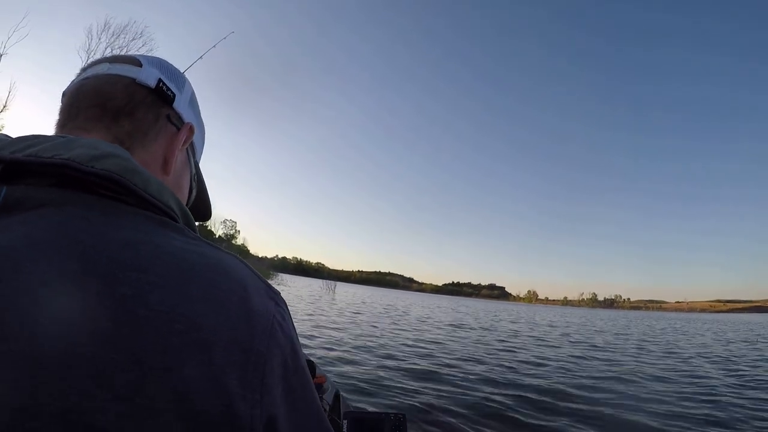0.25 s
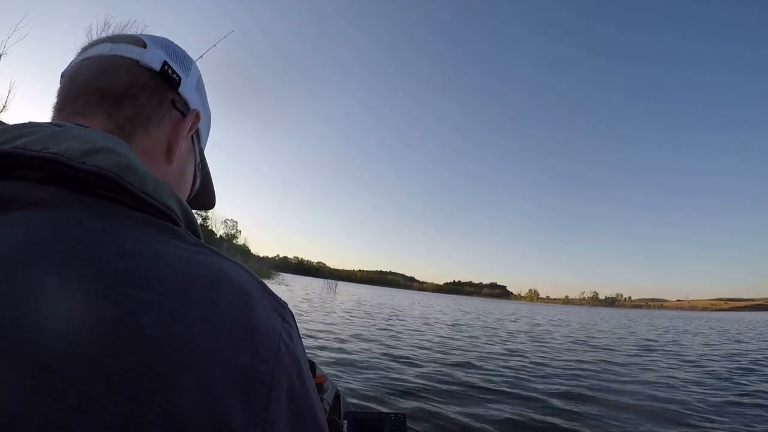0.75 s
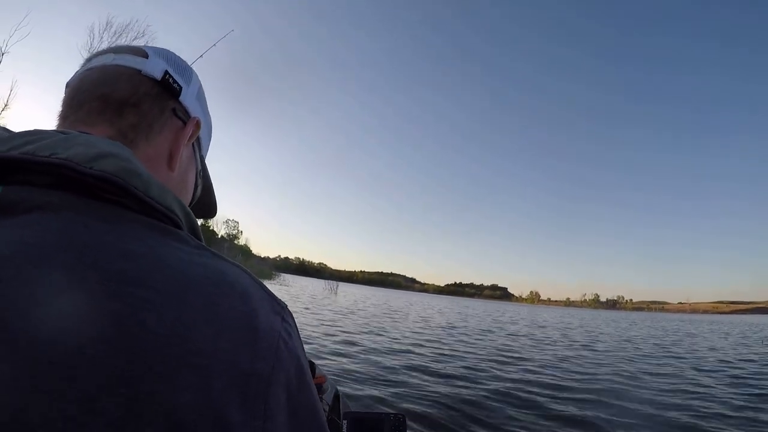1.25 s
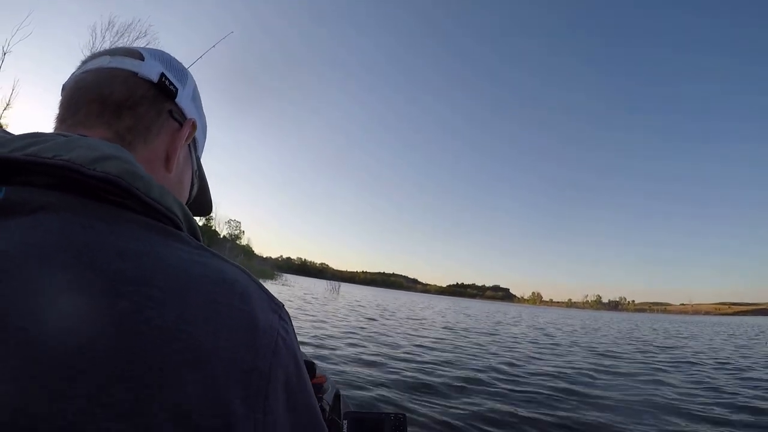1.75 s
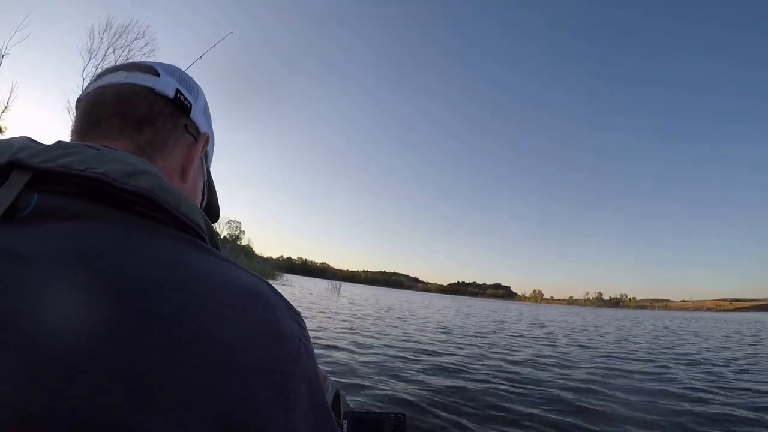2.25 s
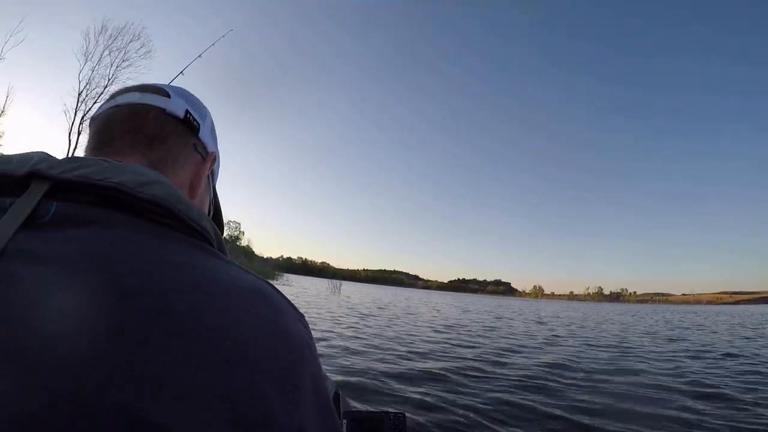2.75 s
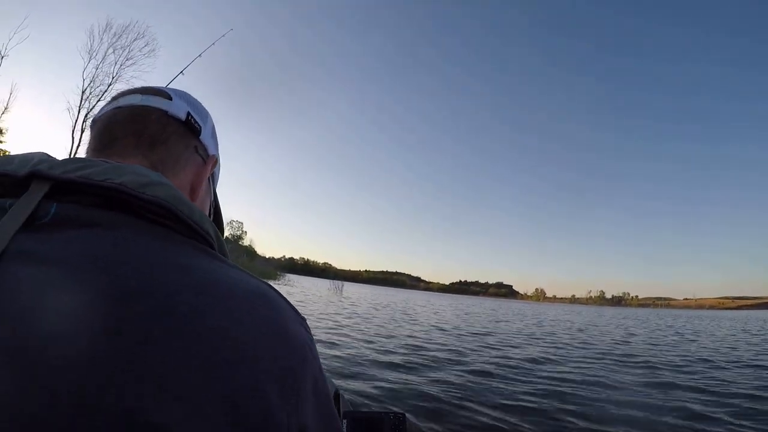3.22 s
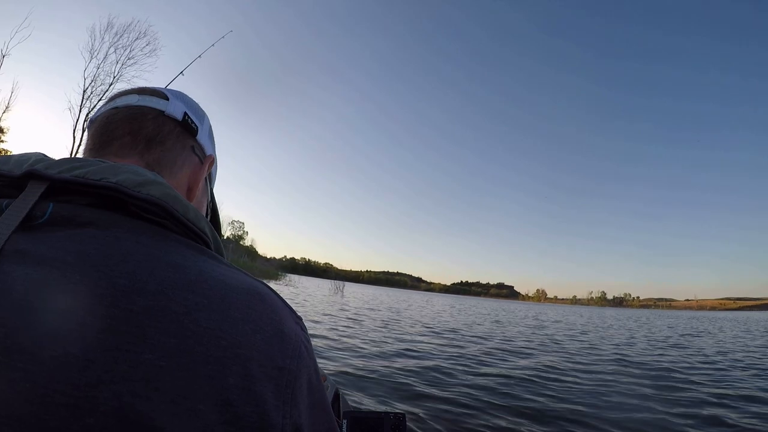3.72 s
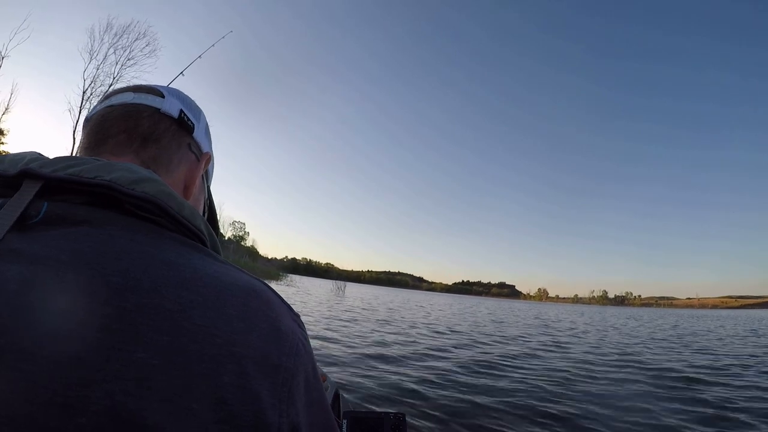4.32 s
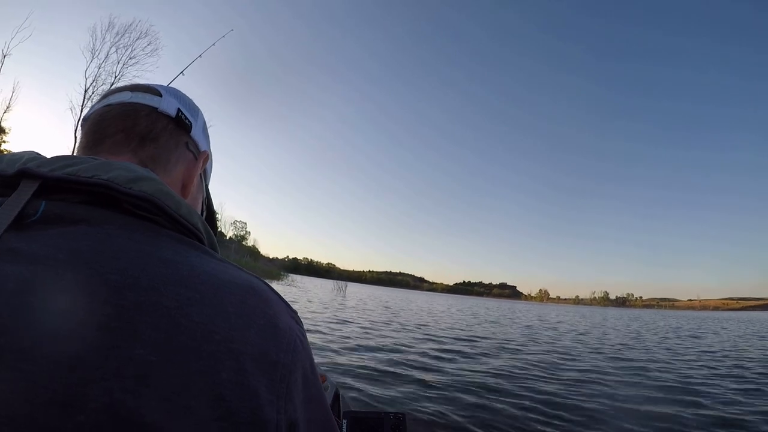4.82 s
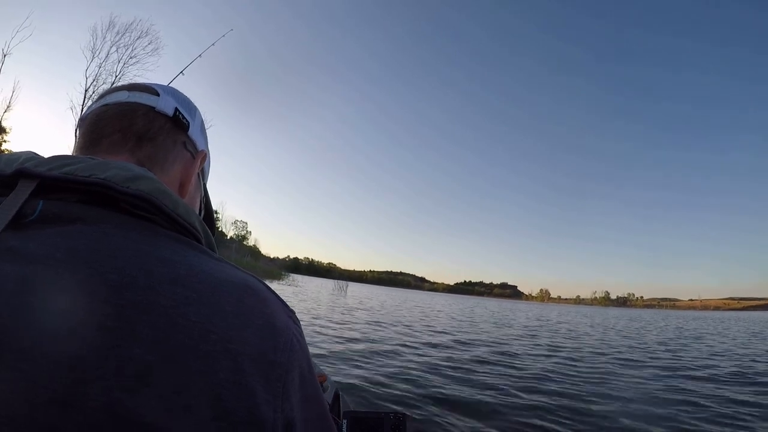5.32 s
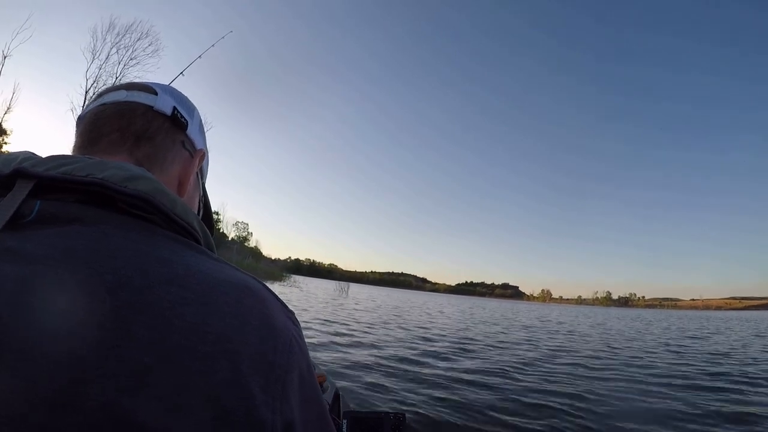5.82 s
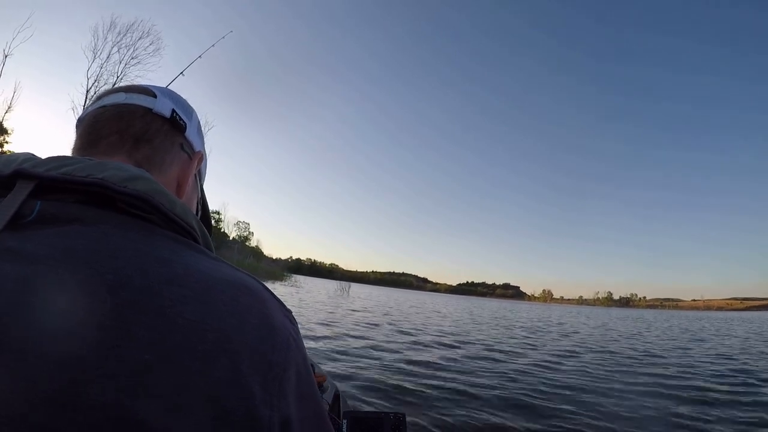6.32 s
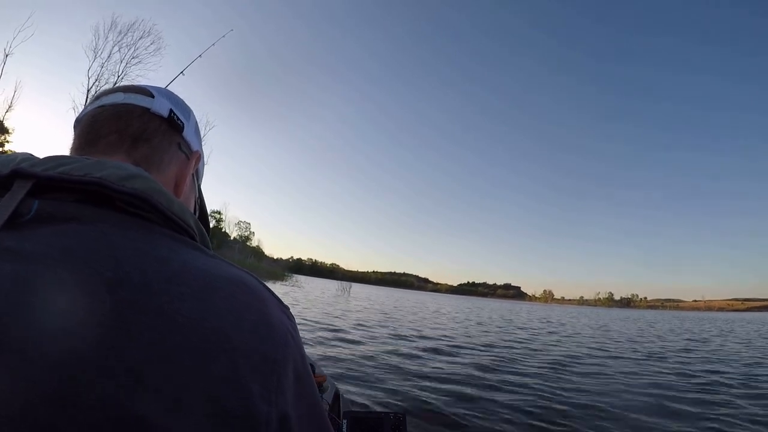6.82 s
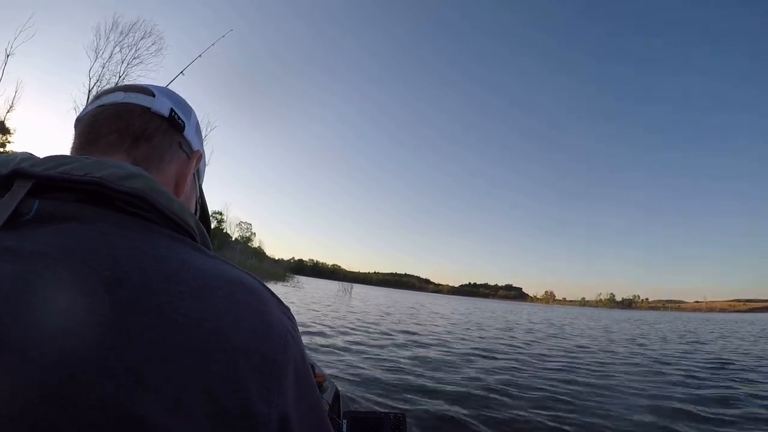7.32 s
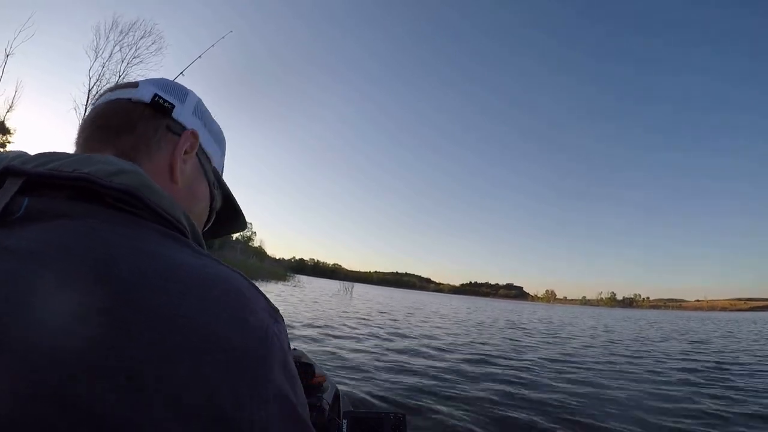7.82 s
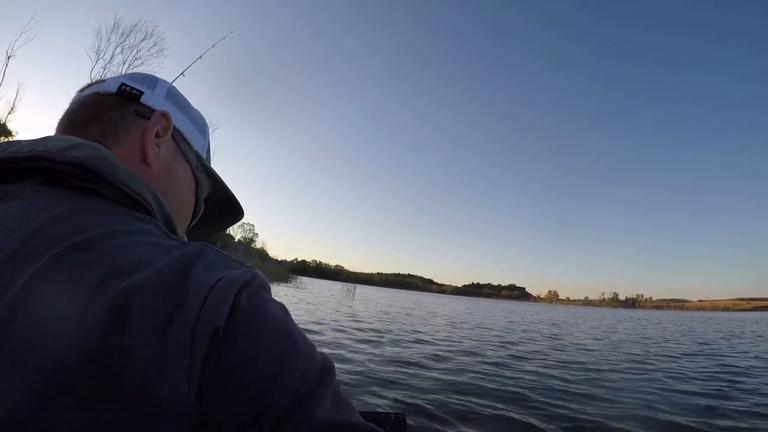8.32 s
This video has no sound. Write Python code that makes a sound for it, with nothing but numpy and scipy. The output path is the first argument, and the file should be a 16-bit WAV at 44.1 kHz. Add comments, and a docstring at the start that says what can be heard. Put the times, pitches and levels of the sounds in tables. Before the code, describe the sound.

Hollow, irregular water slaps on a kayak, with a gust buffeting the microphone and gear knocking before faint birds chirp far away.

```python
"""Small waves slap a plastic kayak on a lake, ringing its hull at two hull-mounted microphone ports.
From the start, water and microphones hiss and electronics whine faintly; the hardest slap is at 0.5 s.
Over the first 3 s a gust shakes the mount, jolts thump, and gear knocks and ticks.
From 2.9 s, as the wind dies, birds whistle and chirp on the far shore above their faint chatter.
Near 8.2 s the gear knocks again; the waves go on to the end."""
import sys
import numpy as np
from scipy import signal
from scipy.io import wavfile
from scipy.ndimage import uniform_filter1d

SR = 44100
rng = np.random.default_rng(int(sys.argv[2]) if len(sys.argv) > 2 else 0)


def transcribe(u):
    """Save the signal u as a 16-bit wav file named by the first command-line argument.

    u: samples, shape (n,) or (channels, n), limited to [-1, 1]; the rate is SR.
    q: integer samples, one column per channel.
    """
    v = np.clip(np.atleast_2d(u).T, -1, 1)
    q = np.round(v * 32767).astype(np.int16)
    wavfile.write(sys.argv[1], SR, q)


N = 377496

# t/s, peak level/dB
WAVE_SLAPS = [(0.022, -28.5), (0.496, -8.5), (0.592, -21.5), (0.762, -20), (0.852, -21), (1.026, -23),
              (1.23, -19), (1.807, -40), (2.604, -15.5), (2.665, -23.5), (2.846, -23.5), (3.353, -20),
              (3.508, -30.5), (3.918, -17), (4.245, -31.5), (4.488, -38), (4.583, -23), (4.821, -30),
              (5.097, -15), (5.342, -26), (5.441, -31.5), (5.7, -36), (5.794, -22), (6.359, -19),
              (6.906, -15.5), (7.076, -29), (7.18, -30), (7.467, -16), (7.69, -28.5), (8.205, -29.5),
              (8.432, -15)]
def slaps():
    """Waves ring the hull. Bigger ones trap deeper-pitched air pockets; weaker ones gurgle longer."""
    out, body = np.zeros((2, N)), panels()
    for (s, db), noise in zip(WAVE_SLAPS, rng.standard_normal((len(WAVE_SLAPS), SR // 5))):
        force = wave_force(noise, life_s=0.02 - 0.0014 * db, start_hz=157 - 0.76 * (db + 25.5))
        add(out, s - 0.018, struck(force, body, db))
    return out


def lapping(rate_per_s=16, rms_db=-40):
    """Wavelets of four shapes patter on the hull at random."""
    sizes = amp(4.4 * np.minimum(rng.exponential(1, N), 2))
    hits = sizes * (rng.random(N) < rate_per_s / SR)
    kind = rng.integers(0, 4, N)
    force = np.zeros(N)
    for k, noise in enumerate(rng.standard_normal((4, SR // 5))):
        shape = wave_force(noise, life_s=0.018 + 0.0071 * k, start_hz=150 + 9 * k, smack=0.51, splash=1)
        force += signal.oaconvolve(hits * (kind == k), shape)[:N]
    return amp(rms_db) * unit_rms(excite(force, panels()))


def wave_force(noise, life_s, start_hz, end_hz=192, smack=0.14, splash=0.8):
    """A smack, a splash and an air pocket whose pitch rises as it shrinks."""
    t = np.arange(0, life_s, 1 / SR)
    age = t / t[-1]
    cycles = np.cumsum(start_hz + (end_hz - start_hz) * age) / SR
    pocket = np.sin(2 * np.pi * cycles) * amp(-8 * age) * signal.windows.tukey(len(t), 0.45)
    spray = unit_rms(lowpass(lowpass(noise[:len(t)], 610), 570))
    spray *= amp(-25 * age) * np.minimum(t / 0.015, 1)
    impact = 12 * (t / 0.0008) * np.exp(-t / 0.0008)
    return pocket + splash * spray + smack * impact


# f/Hz, t60/s, right level/dB, left/right ratio (negative: antiphase)
HULL_AND_MOUNT_MODES = [(50.3, 0.14, 3, -0.1), (77.48, 1, -1.5, 0.5), (93.7, 0.84, -14.5, 1.36),
                        (144.3, 0.33, -6.5, 1.52), (175.8, 0.15, 4, -0.22), (193.5, 0.23, 4, -0.3448),
                        (253, 0.039, -7, -3), (323, 0.061, 5.5, -1.04), (373.3, 0.064, -2, 0.18),
                        (577, 0.08, -12.5, -1.5), (680, 0.023, 7, -1.16), (850, 0.012, 10.5, -0.35),
                        (1073, 0.029, -14, 0.75), (1545, 0.0055, 6.5, -0.35)]
def panels():
    """Impulse response of the hull skin, which ignores slow pushes."""
    return highpass(ringing(HULL_AND_MOUNT_MODES[3:]), 120, order=4)


# t/s, peak level/dB, blow f/Hz, contact t60/s
GEAR_KNOCKS = [(0.185, -23.5, 975, 0.028), (0.478, -20.5, 460, 0.086), (0.497, -8.5, 760, 0.028),
               (.596, -18.5, 463, 0.043), (0.744, -23, 332, 0.21), (0.852, -24.5, 386, 0.14),
               (1.1, -17.5, 288, 0.21), (1.253, -31, 2500, 0.039), (1.41, -22, 386, 0.058),
               (2.326, -16, 925, 0.028), (7.7, -37.5, 910, 0.025), (8.174, -22.5, 1160, 0.047),
               (8.194, -28, 402, 0.13), (8.269, -27.5, 480, 0.03)]
def knocks(blow_q=0.99, scrape_gain=0.023):
    """Gear hits the hull with a short rough force, then scrapes."""
    out, body, t = np.zeros((2, N)), panels(), np.arange(6000) / SR
    for (s, db, hz, t60), rough in zip(GEAR_KNOCKS, rng.standard_normal((len(GEAR_KNOCKS), len(t)))):
        attack = 1 - np.exp(-t / (0.036 * t60))
        contact = attack * (decay(t, t60) + scrape_gain * decay(t, 0.57))
        crack = 0.025 / t60 * np.exp(-t / 0.00058)  # shorter blow, firmer touch
        w = 2 * np.pi * hz
        resonance = signal.bilinear([w * w], [1, w / blow_q, w * w], SR)
        force = lowpass(signal.lfilter(*resonance, rough * contact + crack), 3400)
        force = highpass(force, 300, order=2)  # light gear barely moves low modes
        add(out, s - 0.002, struck(force, body, db))
    return out


# t/s, peak level/dB, f/Hz, t60/s
PART_TICKS = [(0.184, -29, 1680, 0.044), (0.478, -36, 1670, 0.036), (0.498, -23, 1500, 0.0083),
              (0.595, -36.5, 1350, 0.044), (0.747, -41, 6400, 0.037), (0.841, -25, 2350, 0.044),
              (0.847, -29, 2450, 0.044), (1.253, -44, 1480, 0.015), (1.278, -31, 2090, 0.014),
              (1.338, -38, 4100, 0.046), (1.394, -31, 2350, 0.03), (1.412, -31.5, 1600, 0.025),
              (2.249, -45, 1840, 0.028), (2.293, -37, 6900, 0.015), (2.324, -46.5, 2540, 0.015),
              (4.221, -37, 1530, 0.0064), (5.26, -40.5, 1450, 0.028), (7.396, -42, 1580, .026),
              (7.547, -39, 4340, 0.0063), (7.701, -30, 3630, 0.007), (8.168, -39, 1750, 0.051),
              (8.17, -41.5, 3440, .015)]
def ticks(crack_gain=5.8):
    """Small hard parts click and ring briefly, heard through the air."""
    out, t = np.zeros((2, N)), np.arange(6000) / SR
    for (s, db, hz, t60), rough in zip(PART_TICKS, rng.standard_normal((len(PART_TICKS), len(t)))):
        modes = [(hz, min(0.014, t60), 0, 0.8), (hz * 1.258, min(0.01, t60), -5, 0.7),
                 (hz * 2.62, 0.003, -7, 0.6), (hz * 0.36, 0.004, -8, -0.8)]
        part = ringing(modes)[:, :1000]
        part[:, 0] = crack_gain
        contact = lowpass(lowpass(rough, (1.07 + 0.011 / t60) * hz), 8000)
        add(out, s, struck(contact * decay(t, t60), part, db))
    return out


def squeak(s=1.336, length_s=0.022, db=-35):
    """A part rubs: a rising tone with its octave."""
    out = np.zeros((2, N))
    hz = np.geomspace(1500, 2800, round(length_s * SR))
    phase = 2 * np.pi * np.cumsum(hz) / SR
    tone = np.sin(phase) + 0.5 * np.sin(2 * phase)
    add(out, s, amp(db) * tone[None] * np.hanning(len(hz)))
    return out


# t/s, level/dB
MOUNT_WIND = [(0, -52), (0.6, -46.5), (1.3, -22), (1.6, -39), (1.95, -32.5), (2.2, -41.5), (3.28, -61.5),
              (3.37, -40.5), (3.77, -45), (3.86, -51.5), (5.0, -71), (7.0, -77), (8.56, -74)]
# t/s, shake level/dB, sway level/dB
MOUNT_JOLTS = [(0.184, -46, -74), (0.498, -19.5, -51), (0.739, -32.5, -50), (0.86, -23, -32),
               (1.109, -17.5, -40), (1.25, -22, -40), (1.41, -22.5, -42), (1.58, -36.5, -45),
               (1.78, -35, -37), (1.858, -35.5, -46), (2.321, -19, -33), (2.63, -27, -30),
               (2.869, -58, -35)]
def gust(jolt_rise_s=0.011, jolt_fade_db_per_s=104):
    """Turbulence and jolts drive the mount's slow sway and faster shake, spilling into the panels."""
    t = np.arange(N) / SR
    wind = amp(np.interp(t, *np.transpose(MOUNT_WIND)))
    shake_gain, sway_gain = wind * amp(-1), wind
    for s, shake_db, sway_db in MOUNT_JOLTS:
        rise = np.clip((t - s) / jolt_rise_s, 0, 1)
        swing = rise * amp(-jolt_fade_db_per_s * np.maximum(t - s - jolt_rise_s, 0))
        shake_gain += amp(shake_db) * swing
        sway_gain += amp(sway_db) * swing
    pressure = lowpass(rng.standard_normal((4, N)), 190) * amp(2.8 * drift(8.4))
    sway = excite(pressure[0], ringing(HULL_AND_MOUNT_MODES[:1]))
    shake = excite(pressure[1], ringing(HULL_AND_MOUNT_MODES[1:3]) + 0.32 * panels())
    eddy_band = signal.butter(2, [35, 110], "band", fs=SR, output="sos")
    eddies = unit_rms(signal.sosfilt(eddy_band, pressure[2:]))  # independent per port
    sway = sway / sway.mean(0).std() + 0.7 * eddies
    shake = shake / shake.mean(0).std()
    return sway * sway_gain + shake * shake_gain


def thumps(hz=138.6, rise_s=0.0045, over_shake_db=6):
    """Each jolt first reaches the ports as a couple of heavy, dull cycles."""
    out, t = np.zeros((2, N)), np.arange(3000) / SR
    thump = t / rise_s * np.exp(1 - t / rise_s) * np.sin(2 * np.pi * hz * t)
    for s, shake_db, _ in MOUNT_JOLTS:
        add(out, s + 0.0029, amp(shake_db + over_shake_db) * np.outer([-0.4, 2.4], thump))
    return out


# t/s, length/s, f/Hz, level/dB
HELD_WHISTLES = [(2.89, 0.032, 3300, -56), (2.954, 0.055, 3200, -59), (3.205, 0.055, 3280, -60.5),
                 (3.408, .09, 3060, -64), (3.707, 0.036, 3280, -57), (3.935, 0.066, 3300, -57),
                 (4.566, 0.085, 3410, -59.5), (4.908, 0.099, 3374, -50.5), (5.14, 0.12, 3250, -53.5),
                 (5.489, 0.075, 3370, -59.5), (5.707, 0.075, 3190, -61), (5.898, 0.057, 3440, -58.5),
                 (6.303, 0.072, 3600, -57), (6.328, 0.088, 3190, -60)]
# t/s, length/s, end f/Hz, level/dB
RISING_CHIRPS = [(2.871, 0.043, 4400, -57), (3.013, 0.071, 4300, -60), (3.09, .105, 3920, -61),
                 (5.95, 0.17, 4100, -66), (7.223, 0.033, 3390, -52), (7.712, .035, 4300, -56)]
# t/s, length/s, start f/Hz, level/dB
FALLING_CHIRPS = [(4.62, .05, 4560, -60), (4.88, 0.044, 4700, -58), (6.806, 0.048, 4520, -59),
                  (6.9, 0.059, 4300, -57), (7.17, 0.042, 4000, -55), (7.488, 0.026, 4360, -57),
                  (7.511, 0.025, 4320, -53), (7.535, 0.026, 4050, -50), (7.562, 0.033, 4000, -53.5)]
def birds(chatter_per_s=16, chatter_db=-67.5):
    """Wavering, fluttering whistles over random chatter, smeared by shore echoes."""
    notes = [(s, length, hz, hz, db) for s, length, hz, db in HELD_WHISTLES]
    notes += [(s, length, 3000, hz, db) for s, length, hz, db in RISING_CHIRPS]
    notes += [(s, length, hz, hz * 0.72, db) for s, length, hz, db in FALLING_CHIRPS]
    for when, span, start, end, faint in rng.random((round(chatter_per_s * N / SR), 5)):
        notes.append((when * N / SR, 0.03 + 0.12 * span, 2800 + 1700 * start ** 2,
                      2900 + 1000 * end, chatter_db - 6 * faint))
    waver = 1 + 0.011 * drift(22.8, N + SR)
    song = np.zeros((1, N))
    for s, length, start_hz, end_hz, db in notes:
        hz = np.geomspace(start_hz, end_hz, round(length * SR))
        hz *= waver[round(s * SR):][:len(hz)]
        tone = np.sin(2 * np.pi * np.cumsum(hz) / SR)
        add(song, s, amp(db) * tone[None] * signal.windows.tukey(len(hz), 0.5))
    song *= 1 + 0.15 * drift(56)  # flutter
    t = np.arange(8000) / SR
    shore = rng.standard_normal((2, len(t))) * decay(t, 0.071)
    shore /= np.linalg.norm(shore[0])
    return song * [[1], [0.5]] + 0.5 * excite(song[0], shore)


# f/Hz, relative density/dB
IN_PHASE_HISS = [(140, 3.5), (240, 0), (301, -7), (666, -17), (3270, -25.5), (4870, -29.5), (7550, -23.5),
                 (8080, -30), (8700, -27), (12400, -35), (15000, -47)]
# f/Hz, relative density/dB
ANTIPHASE_HISS = [(140, -29), (240, -6.5), (410, -12), (941, -14), (4390, -38), (7630, -29.5),
                  (8200, -32.5), (12200, -40), (13300, -43), (15000, -86)]
def hiss():
    """Open water and microphone noise, part in phase at the ports, part in antiphase."""
    common = shaped_noise(IN_PHASE_HISS, rms_db=-50)
    opposite = shaped_noise(ANTIPHASE_HISS, rms_db=-49.5)
    return np.array([common + opposite, common - opposite])


def whine(hz=10406, rms_db=-82):
    """Steady tone from the electronics."""
    return amp(rms_db) * np.sqrt(2) * np.sin(2 * np.pi * hz * np.arange(N) / SR)


def shaped_noise(spectrum, rms_db, patch_db=0.6):
    """Noise of a given spectrum with faint drifting patches."""
    frames, hz = N // 256 + 5, np.fft.rfftfreq(1024, 1 / SR)
    real, imag, patches = rng.standard_normal((frames, len(hz), 3)).T
    patches = uniform_filter1d(patches, size=12, axis=0)
    patches = unit_rms(uniform_filter1d(patches, size=10, axis=1))
    knot_hz, knot_db = np.transpose(spectrum)
    colour_db = np.interp(np.log(hz + 1), np.log(knot_hz + 1), knot_db, left=-46)
    bins = (real + 1j * imag) * amp(colour_db[:, None] + patch_db * patches)
    return amp(rms_db) * unit_rms(signal.istft(bins, nperseg=1024, noverlap=768)[1][:N])


def ringing(modes):
    """Two-port impulse response of damped modes."""
    t = np.arange(SR // 2) / SR
    return sum(np.outer([abs(left), np.sign(left)], amp(db) * decay(t, t60) * np.sin(2 * np.pi * hz * t))
               for hz, t60, db, left in modes)


def struck(force, body, peak_db):
    """Body response, scaled by the peak of the port mean."""
    sound = excite(force, body)
    return amp(peak_db) * sound / abs(sound.mean(0)).max()


def excite(force, body):
    return signal.fftconvolve(force[None], body, axes=1)[:, :N]


def drift(hz, samples=N):
    return unit_rms(lowpass(rng.standard_normal(samples), hz))


def lowpass(x, hz):
    return signal.sosfilt(signal.butter(2, min(hz, SR / 3), fs=SR, output="sos"), x)


def highpass(x, hz, order):
    return signal.sosfilt(signal.butter(order, hz, "high", fs=SR, output="sos"), x)


def decay(t, t60):
    return amp(-60 * t / t60)


def amp(db):
    return 10 ** (np.asarray(db) / 20)


def unit_rms(x):
    return x / np.sqrt(np.mean(x ** 2) + 1e-20)


def add(mix, s, sound):
    part = mix[:, max(round(s * SR), 0):][:, :sound.shape[1]]
    part += sound[:, :part.shape[1]]


def scene():
    """All sources at the left and right ports."""
    background = hiss() + whine()
    return slaps() + lapping() + knocks() + ticks() + squeak() + gust() + thumps() + birds() + background


def record(dry):
    """Duller left port, bass cut, limiter ducking after the loudest blows, band limit."""
    ceiling_db, release_db_per_s, edge_hz = -1, 22, 15100
    left = 0.86 * dry[0] + 0.27 * lowpass(dry[0], 5200)
    ports = highpass(np.array([left, dry[1]]), 37, order=4)
    peak_db = 20 * np.log10(abs(ports).max(0) + 1e-9)
    release_db = np.arange(N) * release_db_per_s / SR
    held_db = np.maximum.accumulate(peak_db + release_db) - release_db
    over_db = np.maximum(held_db - ceiling_db, 0)
    ducked = ports / amp(uniform_filter1d(over_db, size=200, origin=-80))
    band_limit = signal.firwin(511, edge_hz, window=("kaiser", 9), fs=SR)
    return signal.oaconvolve(ducked, band_limit[None], "same")


dry = scene()
out = record(dry)
transcribe(out)
```